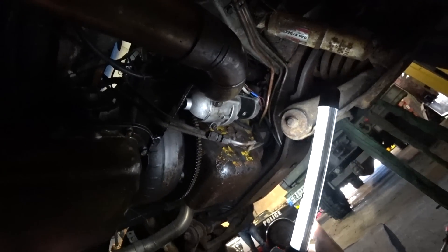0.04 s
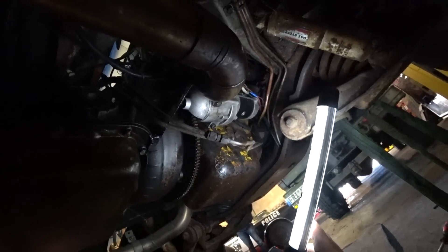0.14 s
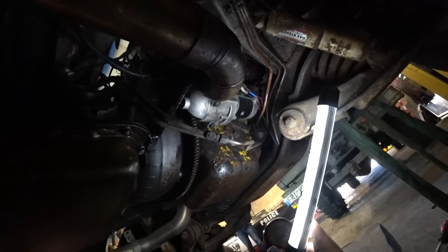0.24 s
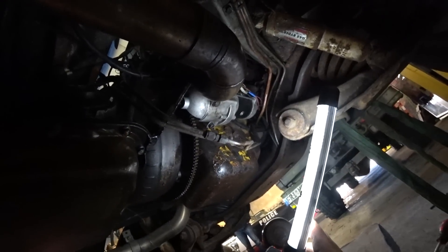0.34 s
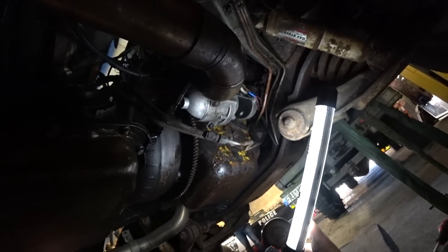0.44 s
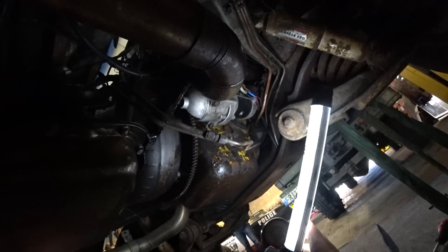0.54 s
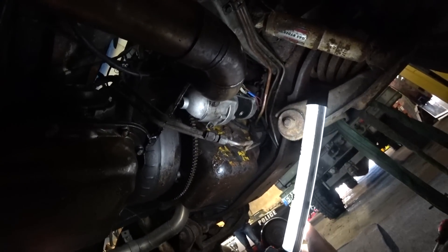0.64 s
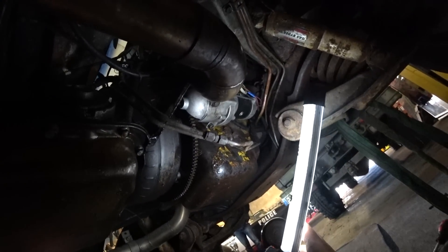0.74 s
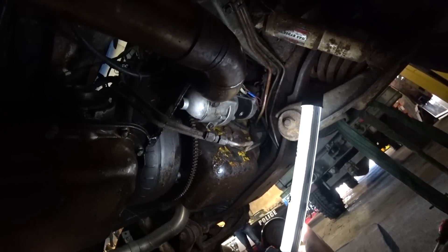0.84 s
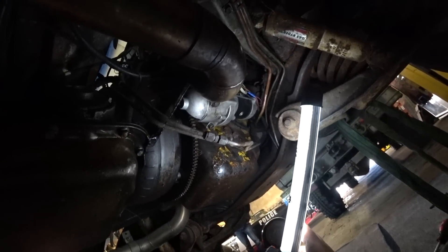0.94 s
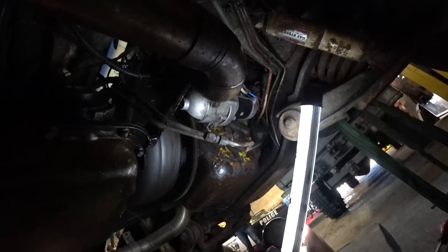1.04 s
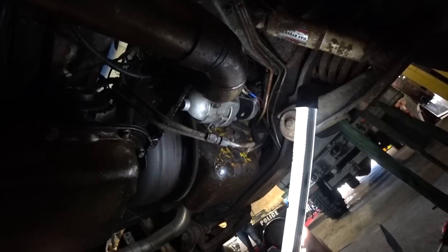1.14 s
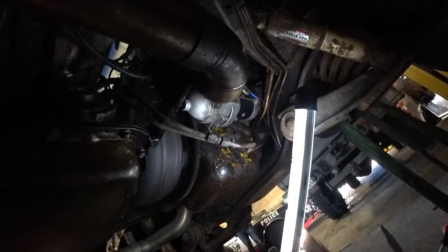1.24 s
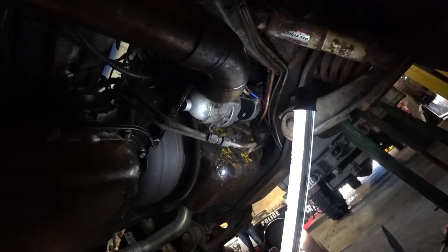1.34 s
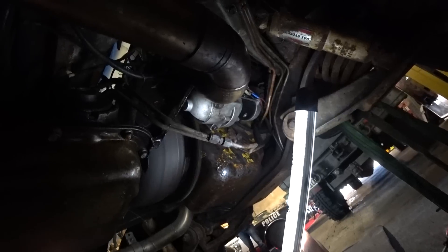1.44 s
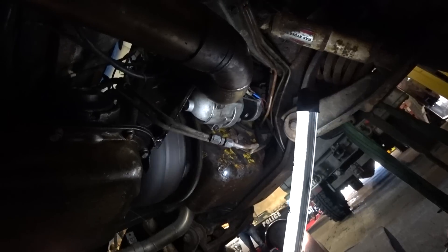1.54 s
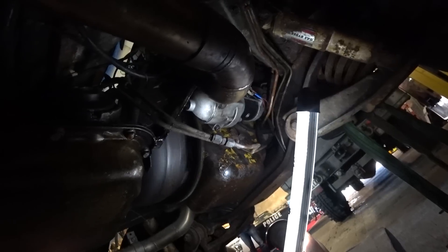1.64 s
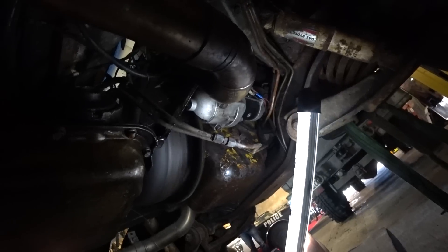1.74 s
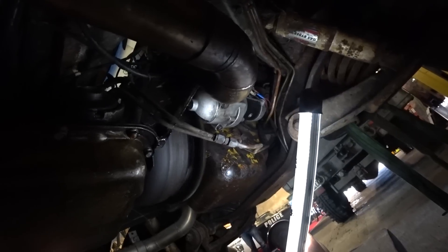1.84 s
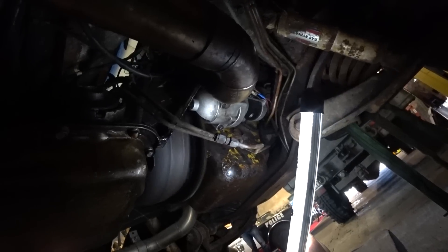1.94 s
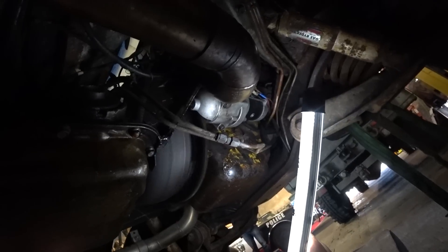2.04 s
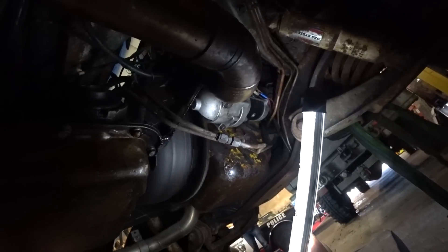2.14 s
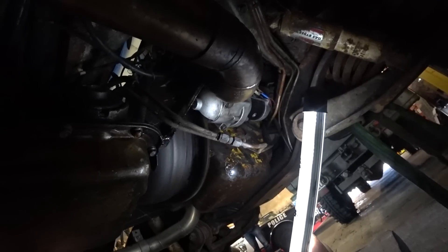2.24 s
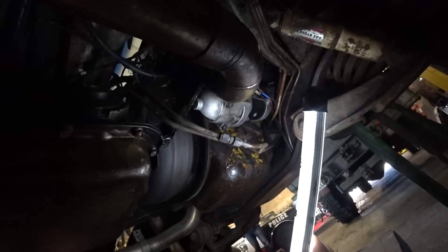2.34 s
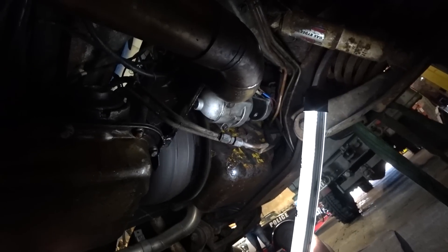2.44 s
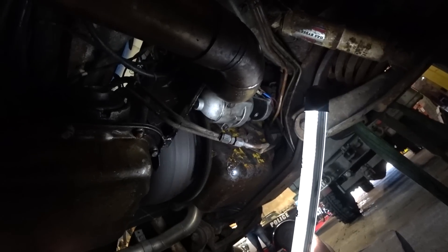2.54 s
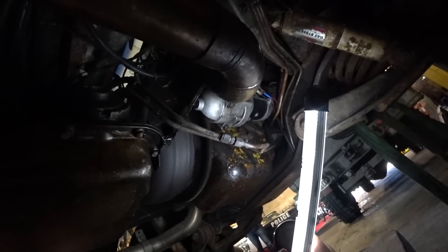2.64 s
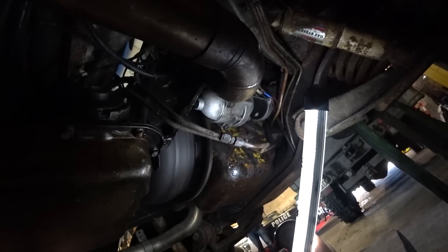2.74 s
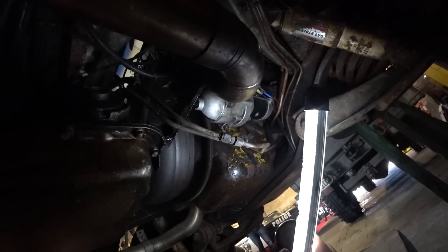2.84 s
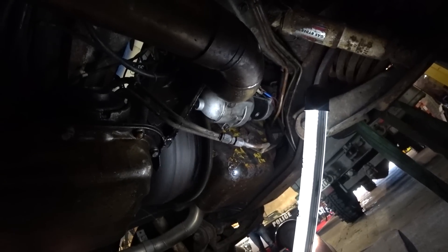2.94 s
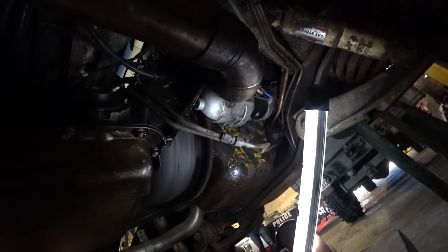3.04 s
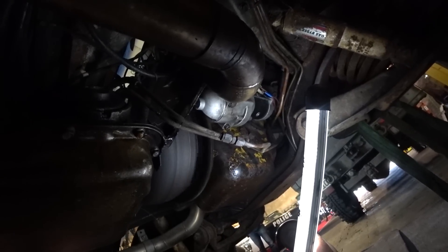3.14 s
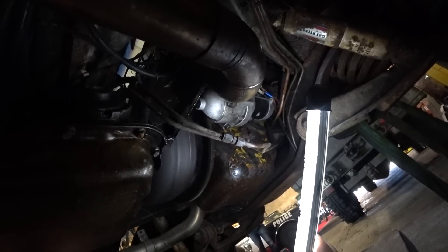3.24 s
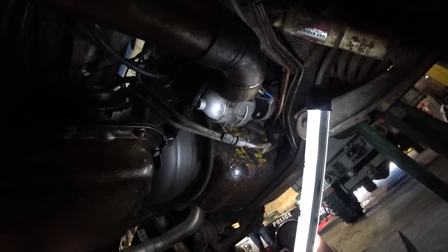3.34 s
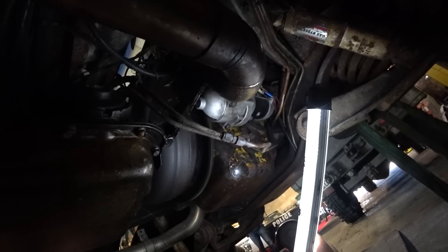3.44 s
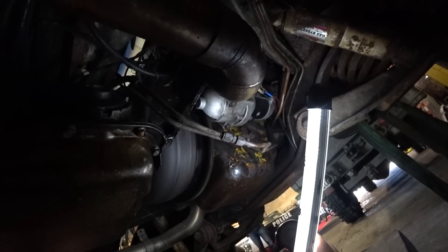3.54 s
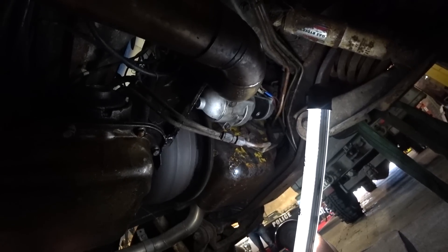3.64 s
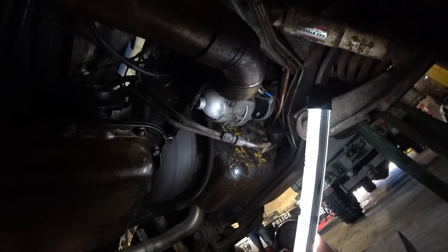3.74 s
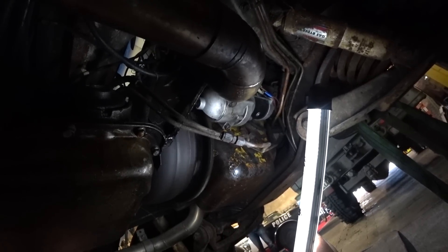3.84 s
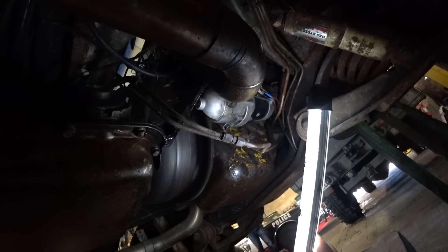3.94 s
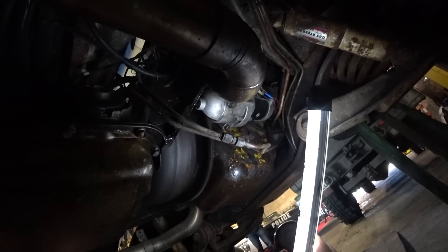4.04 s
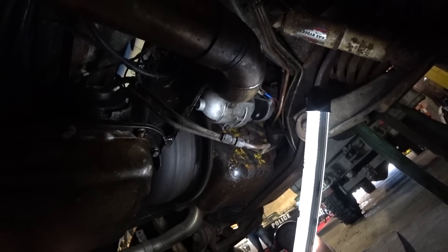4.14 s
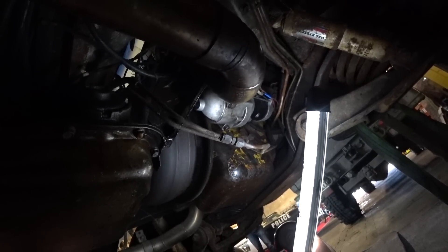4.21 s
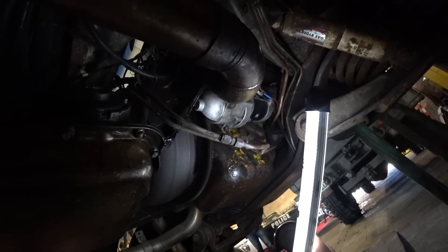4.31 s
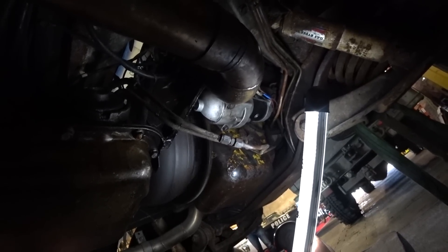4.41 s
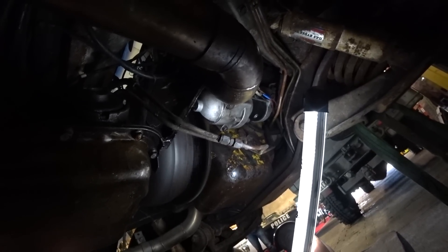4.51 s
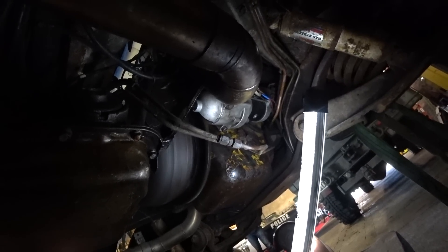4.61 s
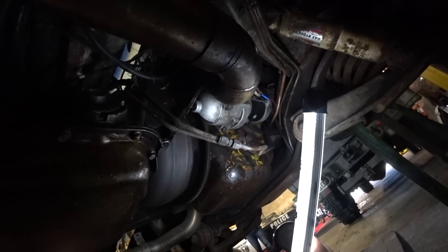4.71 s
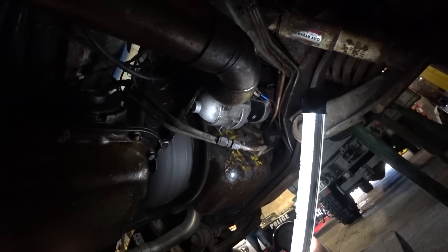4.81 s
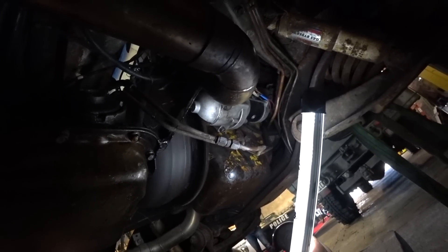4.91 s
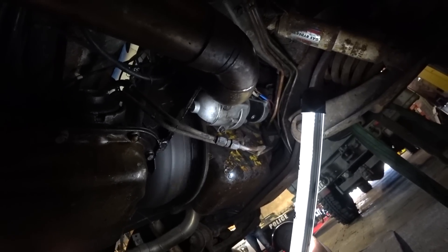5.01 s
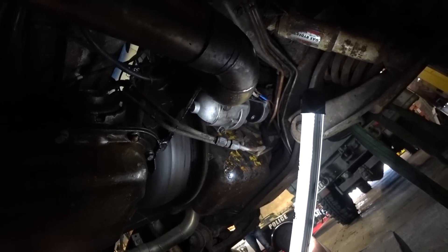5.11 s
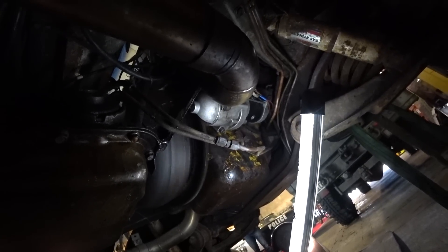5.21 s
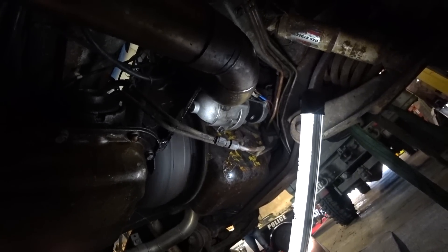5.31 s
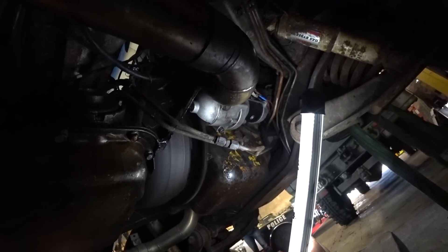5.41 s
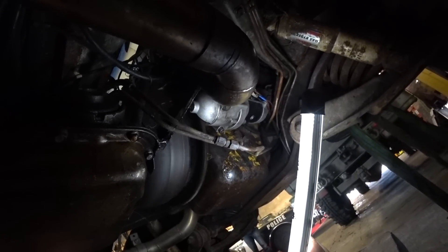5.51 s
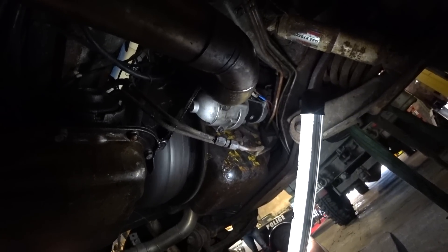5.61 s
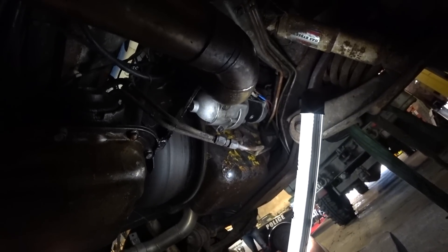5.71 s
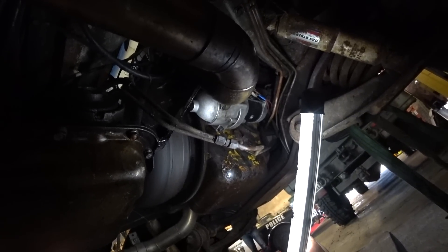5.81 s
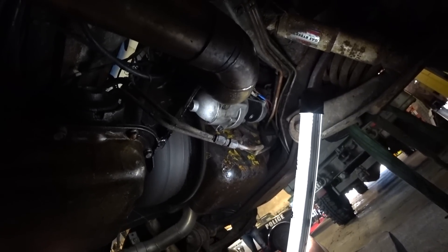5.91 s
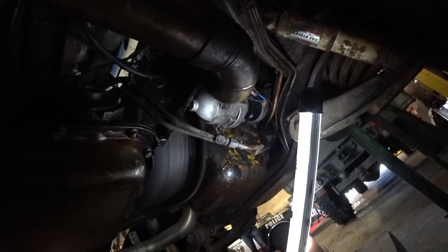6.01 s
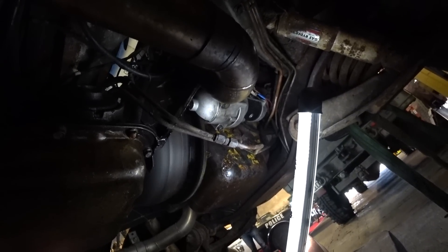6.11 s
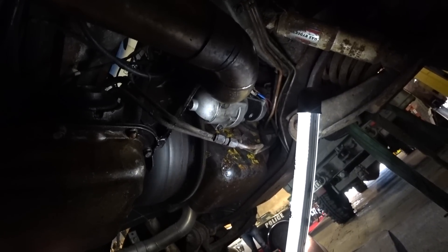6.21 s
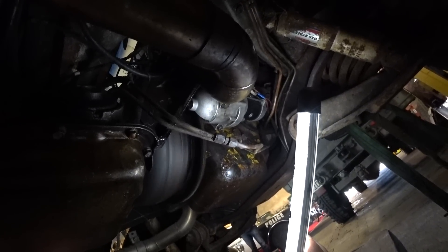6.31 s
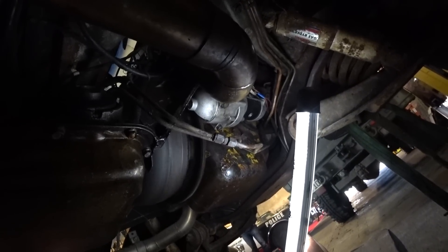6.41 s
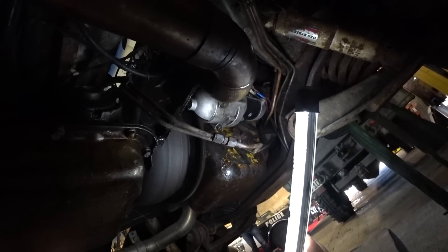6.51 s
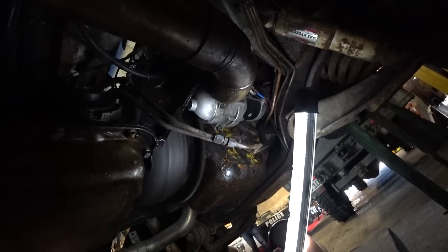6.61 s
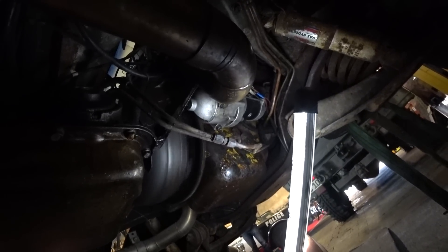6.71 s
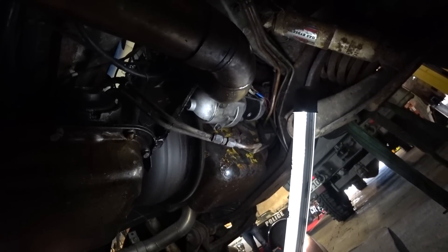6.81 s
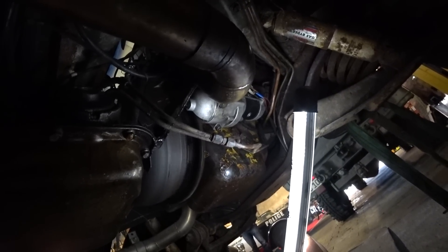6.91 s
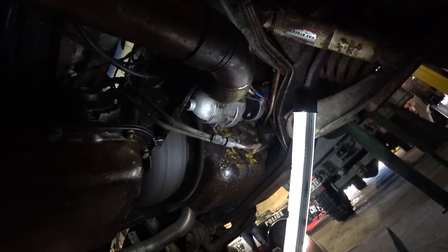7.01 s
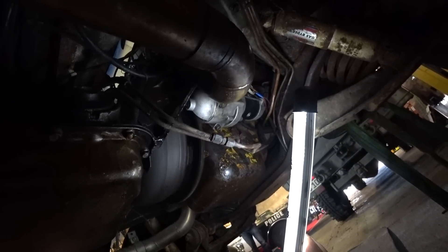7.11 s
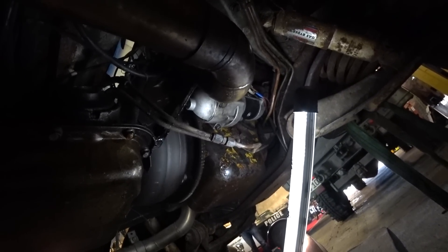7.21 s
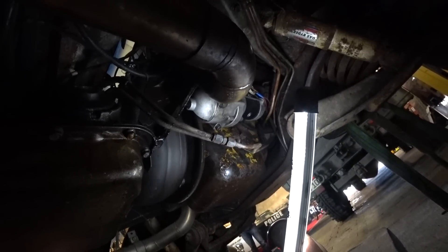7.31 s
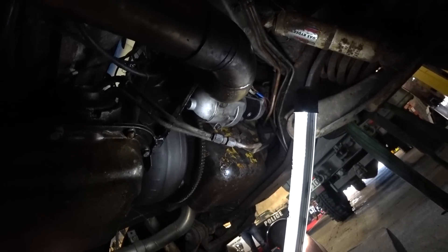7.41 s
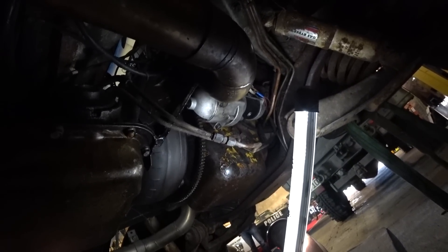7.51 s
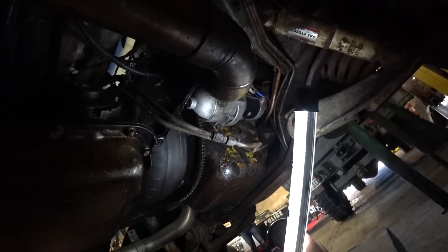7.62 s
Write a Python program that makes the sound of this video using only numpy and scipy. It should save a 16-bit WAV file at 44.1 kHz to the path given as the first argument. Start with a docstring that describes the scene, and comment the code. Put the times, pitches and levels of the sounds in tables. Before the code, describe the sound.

Close beneath a vehicle in a workshop, a diesel engine is cranked but will not start. Small ticks lead to a loud starter clack, then a steady run of grinding, whining gear teeth that sags and recovers with each compression, with a short groan about once a second. The cranking stops abruptly, leaving a brief shudder and a last metallic clack over faint room hiss.

```python
"""In a workshop, heard from under the vehicle, a starter motor cranks a diesel that never fires.
Metal ticks, the solenoid (the starter's magnetic switch) clacks, and the pinion (its small gear)
grinds round the open ring gear on the flywheel, clattering and whining. The cylinders squeeze their
air unevenly, dragging the speed up and down, and the housing groans at the hardest squeezes.
Then the drive cuts out, the teeth knock in the gaps between them and the pinion snaps back."""
import sys
import numpy as np
from scipy import signal
from scipy.fft import rfft, irfft
from scipy.io import wavfile
from scipy.ndimage import uniform_filter1d

SR = 44100
rng = np.random.default_rng(int(sys.argv[2]) if len(sys.argv) > 2 else 0)


def int16_out(signal):
    """Quantize to a 16-bit WAV file."""
    q = np.round(np.clip(np.atleast_2d(signal).T, -1, 1) * 32767)
    wavfile.write(sys.argv[1], SR, q.astype(np.int16))


N = 337806
TIME = np.arange(N) / SR
RING_TEETH, PINION_TEETH = 139, 11
MOTOR_ORDER = 3.1  # vibrations of the starter's own gearing per ring-gear tooth
FLICKER_HZ = 14


def amp(db):
    """Turns decibels into a gain."""
    return 10 ** (np.asarray(db) / 20)


def unit(x):
    """Scales a signal to an average (rms) level of 1."""
    return x / np.sqrt(np.mean(x ** 2) + 1e-20)


def bump(at, width_s, t=TIME):
    """A smooth rise and fall that reaches 1 at the given second."""
    return np.exp(-((t - at) / width_s) ** 2)


def read(points, hz):
    """Reads between a table's rows on a log-frequency axis."""
    row_hz, value = np.transpose(points)
    return np.interp(np.log(hz + 1), np.log(row_hz + 1), value)


def wander(hz, size=4096):
    """A random drift of average size 1, moving up to about the given rate."""
    rates = np.fft.rfftfreq(size, TIME[-1] / size)
    spectrum = rfft(rng.standard_normal(size)) / (1 + (rates / hz) ** 4)
    return np.interp(TIME, np.linspace(0, TIME[-1], size), unit(irfft(spectrum)))


def colour(x, spectrum, resonances=(), size=8192):
    """Filters a sound with a broad tone curve and narrow ringing peaks."""
    hz = abs(np.fft.fftfreq(size, 1 / SR))
    gain = amp(read(spectrum, hz))
    for centre, width, lift_db in resonances:
        gain = gain * np.sqrt(1 + (amp(abs(lift_db)) ** 2 - 1) / (1 + (2 * (hz - centre) / width) ** 2))
    # this phase makes the ringing follow a hit, never come before it
    response = np.fft.ifft(np.exp(np.conj(signal.hilbert(np.log(gain))))).real
    return signal.oaconvolve(x, response[:size // 2])[:len(x)]


def steady(x, size):
    """Evens out the level over `size` samples."""
    return x / np.sqrt(abs(uniform_filter1d(x ** 2, size)) + 1e-9)


def swell(x, low_hz, high_hz, lift_db):
    """Lifts and lowers one band about its usual level."""
    band = signal.sosfiltfilt(signal.butter(2, [low_hz, high_hz], "band", fs=SR, output="sos"), x)
    return x + band * (amp(lift_db) - 1)


def rough_tone(turns, rough):
    """One tone, shaken in strength and phase as by loosely fitting teeth."""
    angle = 2 * np.pi * (turns + rng.random())
    return (1 + rough * wander(64)) * np.cos(angle) + rough * wander(59) * np.sin(angle)


# The shop's background noise. Each row: frequency in Hz, relative level in dB.
AIR_COLOUR = [(25, -6), (65, -3), (100, 0), (150, -9), (250, -12), (400, -14), (1200, -14), (2000, -19),
              (3000, -23), (5000, -27), (7000, -26), (9500, -32)]


def workshop_air(level_db=-61, width=.22):
    """The quiet rumble and hiss of the shop, slightly different in each ear."""
    middle, side = (unit(colour(rng.standard_normal(N), AIR_COLOUR)) for _ in range(2))
    return amp(level_db) * unit(np.array([middle + width * side, middle - width * side]))


# Small metal ticks close by. Each row: start in seconds, relative level in dB.
TICK_HITS = [(0.3875, -34), (0.631, -44), (0.8594, -40)]
# The notes they ring with. Each row: pitch in Hz, width in Hz, boost in dB.
TICK_RINGS = [(4950, 90, 25), (7790, 80, 13), (9700, 90, 10)]


def ticks(decay_s=0.0097, level_db=-12):
    """Tiny taps on a thin metal part that pings."""
    taps = sum(amp(db) * (TIME >= s) * np.exp(-abs(TIME - s) / decay_s) for s, db in TICK_HITS)
    spectrum = [(300, -26), (2500, -25), (4500, -12), (6500, -8), (11000, 0)]
    return amp(level_db) * colour(taps * rng.standard_normal(N), spectrum, TICK_RINGS)


# Knocks of solenoid, pinion and loose teeth. Each row: start in seconds, relative level in dB,
# bass score, treble score (a higher score gives more of that band).
KNOCK_HITS = [(0.792, -16, -40, -17), (1.02, -7, -26, 1.5), (7.316, -26.5, -8, -23.5),
              (7.35, -24, -14, -26), (7.38, -24, -51, -17), (7.497, -17.5, -40, -28)]
# The tone of a knock's crash. Each row: frequency in Hz, gain in dB.
CRASH_COLOUR = [(60, -20), (250, -12.5), (600, -5), (1200, -3), (2000, -1), (3000, 2.5), (5000, -2),
                (6500, -10.5), (11000, -18)]
# The starter body's notes. Each row: pitch in Hz, relative level in dB, seconds to fade by 60 dB.
STARTER_RINGS = [(358, -31, 0.5), (783, -25, 0.23), (1060, -14.5, 0.13), (1170, -11.5, 0.076),
                 (1560, -16, 0.14), (2220, -16.5, 0.13), (2910, -8, 0.087), (3480, -2.5, 0.048),
                 (4060, -14, 0.05), (5200, -4.5, 0.04), (5800, -12, 0.046)]


def knocks(rise_s=0.0014, crack_s=0.01, rattle_db=-23, rattle_s=0.016, ring_db=-6, level_db=-8):
    """Steel slams on steel: a short crash of contacts and the ring of the starter body."""
    out, t = np.zeros(N + SR), np.arange(SR // 2) / SR
    _, _, usual_bass, usual_treble = np.median(KNOCK_HITS, axis=0)
    fade = np.exp(-t / crack_s) + amp(rattle_db) * np.exp(-t / rattle_s)
    ring = sum(amp(db - 60 * t / fade_s) * np.sin(2 * np.pi * hz * t) for hz, db, fade_s in STARTER_RINGS)
    for start, db, bass, treble in KNOCK_HITS:
        crash = colour(rng.standard_normal(len(t)) * fade, CRASH_COLOUR)
        tilt = [(900, 0.42 * (bass - usual_bass)), (2800, 0.016), (6500, 0.53 * (treble - usual_treble))]
        hit = colour(crash + amp(ring_db) * ring, tilt)
        hit *= 1 - np.exp(-t / rise_s)  # the contacts close one after another
        out[round(start * SR):][:len(t)] += amp(db + level_db) * hit / np.std(hit[:SR // 100])
    return out[:N]


def motor_rub(at=0.863, width_s=0.079, level_db=-56):
    """The motor creeps round with a faint rub before the pinion bites."""
    spectrum = [(100, -12.5), (400, -2.5), (700, -3), (1100, 0), (1700, -13), (2900, -4), (4000, -15),
                (6000, -15), (9000, -26)]
    return amp(level_db) * unit(colour(rng.standard_normal(N), spectrum)) * bump(at, width_s)


# Engine cycles, each ending as the tightest cylinder squeezes hardest.
# Each row: end in seconds, strength of that cycle's squeezes (1 is normal).
ENGINE_CYCLES = [(1.646, 1.15), (2.789, 1.05), (3.94, 1.07), (5.06, .97), (6.171, .95), (7.291, .97)]
# Only four cylinders hold their air. Each row: place in the cycle from 0 to 1, how hard it brakes.
SQUEEZES = [(.265, .30), (.724, .347), (.859, .27), (1, .455)]


def cranking_speed(free_teeth_per_s=318, start_s=1.03, spin_up_s=.033, first_cycle_s=1.282, cut_s=7.27,
                   coast_s=0.18, squeeze_s=.075, spring_s=.038, recover_s=.193, slow_share=.657):
    """Teeth passing per second: each squeeze brakes the engine, which springs back and regains speed."""
    t = np.linspace(0, TIME[-1], 4096)
    ends, strengths = np.transpose(ENGINE_CYCLES)
    starts = np.r_[ends[0] - first_cycle_s, ends[:-1]]
    drag = np.zeros(len(t))
    for start, end, strength in zip(starts, ends, strengths):
        for place, tightness in SQUEEZES:
            top = start + place * (end - start)
            if top > start_s:
                spring = (1 - slow_share) * bump(top, spring_s, t)
                recover = slow_share * np.exp(-abs(t - top) / recover_s)
                drag += strength * tightness * np.where(t < top, bump(top, squeeze_s, t), spring + recover)
    spin_up = 1 - np.exp(-np.maximum(t - start_s, spin_up_s / 10) / spin_up_s)
    coast = np.maximum(t - cut_s, 0) / coast_s
    return np.interp(TIME, t, free_teeth_per_s * spin_up * np.exp(-drag - coast))


def effort(speed, usual_teeth_per_s=245, octaves_per_s=5):
    """Load (octaves below the usual speed) and pull (-1 braking to 1 speeding up)."""
    load = np.clip(np.log2(usual_teeth_per_s / speed), -1, .5)
    pull = np.tanh(np.gradient(np.log2(speed)) * SR / octaves_per_s)
    return load, pull


def engaged(start_s=1.04, rise_s=0.007, stop_s=7.23, fade_s=0.015):
    """The gears take up the load quickly and fall quiet once the current is cut."""
    return np.clip((TIME - start_s) / rise_s, 0, 1) * np.exp(-np.maximum(TIME - stop_s, 0) / fade_s)


def tooth_strikes(teeth, jitter_s, worn_db, chance_db):
    """One sharp click per tooth; the wear on each gear repeats with every turn."""
    number = np.arange(1, int(teeth[-1]) - 1)
    late, chance = rng.standard_normal((len(number), 2)).T
    wear = sum(rng.standard_normal(count)[number % count] for count in (PINION_TEETH, RING_TEETH))
    force = amp(worn_db * wear + chance_db * chance)
    at = (np.interp(number, teeth, TIME) + jitter_s * late) * SR
    near = at.astype(int)[:, None] + np.arange(-8, 9)
    clicks = force[:, None] * np.sinc(near - at[:, None])  # lets a click fall between samples
    return unit(np.bincount(near.ravel(), clicks.ravel(), N)[:N])


# Travel time of bending waves in the steel. Each row: frequency in Hz, delay in seconds.
STEEL_DELAYS = [(500, 0.002912), (2000, 0.008), (3500, 0.0067), (6000, 0.006), (11000, 0.0065)]


def through_steel(x):
    """Pitches cross steel at different speeds, smearing each click into a short chirp."""
    hz = np.fft.rfftfreq(N, 1 / SR)
    lag_turns = np.cumsum(read(STEEL_DELAYS, hz)) * hz[1]
    return irfft(rfft(x) * np.exp(-2j * np.pi * lag_turns), N)


def flywheel(x, ring_s=0.0062, shift_hz=20, count=6):
    """The contact travels round the wheel, so its mix of notes keeps shifting at an even level."""
    t = np.arange(SR // 20) / SR
    rings = rng.standard_normal((count, len(t))) * np.exp(-t / ring_s)
    mix = np.array([wander(shift_hz) for _ in rings])
    ringing = signal.oaconvolve(x[None], rings, axes=1)[:, :N]
    return unit((mix * ringing).sum(0) / np.linalg.norm(mix, axis=0))


# The tone of the clattering teeth. Each row: frequency in Hz, relative level in dB.
TOOTH_COLOUR = [(50, -37.5), (150, -27.5), (260, -23.5), (400, -20), (1000, -13), (1400, -10.5), (2000, -3),
                (3200, 0.5), (4200, 1), (5400, 2), (6200, -5), (7000, -4.5), (7600, -12.5), (11000, -12.5)]
# The notes of the housing round the flywheel. Each row: pitch in Hz, width in Hz, boost in dB.
HOUSING_RINGS = [(525.7, 18.6, 9.5), (711, 42, 7), (772, 29, 6), (1065, 210, 2.5), (1800, 103, 6.5),
                 (2250, 160, 2.5), (2534, 59, 9.5), (3208, 94, 8), (3560, 170, 2), (4190, 78, 4),
                 (4574, 80, 3.5), (8290, 210, 5.5)]


def clatter(teeth, load, pull, rebound_db=-6, scrape_db=-5, wheel_db=1, level_db=-15, stall_db=-7):
    """Each tooth strikes, scrapes and bounces, and the flywheel and housing ring."""
    strike = tooth_strikes(teeth + 0.0094 * wander(44), jitter_s=.000034, worn_db=0.96, chance_db=1.23)
    bounce = tooth_strikes(teeth - .37 + 0.0817 * wander(23.8), jitter_s=.0001, worn_db=0, chance_db=1.5)
    scrape = unit(rng.standard_normal(N) * np.exp(-(teeth % 1) / 0.48))  # fades along each tooth
    force = unit(through_steel(strike + amp(rebound_db) * bounce + amp(scrape_db) * scrape))
    metal = colour(force + amp(wheel_db) * flywheel(force), TOOTH_COLOUR, HOUSING_RINGS)
    # load dulls the teeth, hard braking makes them rattle
    treble_db = -4 * load + 2 * np.minimum(pull, 0) ** 4 + 1.6 * wander(FLICKER_HZ)
    metal = swell(metal, 7100, 18000, treble_db)
    metal = swell(metal, 1800, 2770, lift_db=pull + 0.4 * wander(FLICKER_HZ))
    slowing_db = stall_db * np.maximum(load, 0) ** 2 - load  # slower teeth are quieter
    return steady(metal, size=1100) * amp(level_db + slowing_db + 0.38 * wander(FLICKER_HZ))


# The tones of the meshing gears. Each row: multiple of the tooth rate, relative level in dB.
GEAR_TONES = [(2, -2), (3, -3), (4, -0.5), (5, 2), (6, -12), (7, 1.5), (8, -21)]
# The tone curve the whine passes through. Each row: frequency in Hz, gain in dB.
GEAR_COLOUR = [(150, -45), (300, -12), (450, -14), (540, -9), (610, -18), (700, -6), (790, -3), (910, -2),
               (1000, -7), (1150, -2.5), (1380, -12.5), (1580, -2), (1800, 1.5), (2600, -5), (4000, -12.5)]


def whine(teeth, load, pull, rough=0.43, level_db=-44, load_db=5, pull_db=2, flicker_db=3):
    """Ring-gear and starter-gear tones grow under load and flare as they cross the housing's notes."""
    ring_gear = sum(amp(db) * rough_tone(k * teeth, rough) for k, db in GEAR_TONES)
    motor = sum(amp(db) * rough_tone(k * MOTOR_ORDER * teeth, rough)
                for k, db in [(1, 2), (2, -6), (3, -14)])
    gain = amp(level_db + load_db * load + pull_db * pull + flicker_db * wander(FLICKER_HZ))
    return colour((ring_gear + motor) * gain, GEAR_COLOUR, HOUSING_RINGS)


# How the hum follows the speed. Each row: teeth per second, relative level in dB.
HUM_LEVELS = [(170, -60), (240, -45), (300, -50)]


def hum(teeth, speed, flicker_db=2):
    """A low note at the tooth rate, which the panels give off poorly when the engine slows."""
    level_db = read(HUM_LEVELS, speed) - flicker_db / 2 + flicker_db * wander(FLICKER_HZ)
    return amp(level_db) * rough_tone(teeth, rough=0.58)


# Groans as the starter takes up the load and at the hardest squeezes.
# Each row: loudest moment in seconds, level in dB, half-length in seconds.
GROAN_SURGES = [(1.051, -23.5, 0.018), (1.662, -42, .03), (2.81, -36.5, 0.026), (3.963, -30.5, 0.019),
                (5.084, -33.5, .02), (6.2, -33.5, 0.018)]
# The tone of their rasp. Each row: frequency in Hz, relative level in dB.
RASP_COLOUR = [(60, -23), (300, -16), (520, -9), (750, -12), (900, 0), (1200, -11), (1600, -22),
               (4000, -45)]


def groans(note_hz=532, note_db=4.5, lead_s=0.021, stretch=1.5):
    """The strained housing rasps; in all but the first groan its lowest note sings just ahead."""
    surge = sum(amp(db) * bump(s, width_s) for s, db, width_s in GROAN_SURGES)
    sing = sum(amp(db + note_db) * bump(s - lead_s, stretch * width_s)
               for s, db, width_s in GROAN_SURGES[1:])
    rasp = steady(colour(rng.standard_normal(N), RASP_COLOUR, HOUSING_RINGS), size=1500)
    return surge * rasp + sing * rough_tone(note_hz * TIME, rough=.2)


def rundown(teeth, at=7.32, motor_at=7.27, body_hz=783):
    """The engine shudders to rest while the motor spins down and the starter body sings on."""
    spectrum = [(40, -11), (90, 4), (140, -3), (260, 3.5), (450, -4), (800, -6), (1400, -9),
                (3500, -13), (9000, -34)]
    shudder = amp(-46) * unit(colour(rng.standard_normal(N), spectrum)) * bump(at, width_s=0.17)
    spin = amp(-51) * rough_tone(MOTOR_ORDER * teeth, rough=0.56) * bump(motor_at, width_s=0.048)
    sing = amp(-51) * rough_tone(body_hz * TIME, rough=0.73) * bump(at, width_s=0.15)
    return shudder + spin + sing


def reverberate(x, decays, size=128):
    """A dense wash of echoes in stereo, each band dying at its own speed."""
    hz, t, noise = signal.stft(rng.standard_normal((2, SR // 2)), SR, nperseg=size)
    fade = np.exp(-np.log(1000) * t / read(decays, hz)[:, None])
    tail = signal.istft(noise * fade, SR, nperseg=size)[1]
    tail[:, :size // 4] = 0  # a gap before the first echo
    tail /= np.linalg.norm(tail, axis=1, keepdims=True)
    return signal.oaconvolve(x[None], tail, axes=1)[:, :N]


# Echoes under the vehicle and in the shop. Each row: frequency in Hz, seconds to fade by 60 dB.
UNDERBODY_FADES = [(200, 0.044), (1000, 0.037), (4000, 0.05), (11000, 0.012)]
SHOP_FADES = [(200, .6), (1000, 0.76), (3000, 0.36), (6000, 0.18), (11000, 0.11)]
# Strength of the sideways echoes under the vehicle. Each row: frequency in Hz, gain in dB.
SIDE_COLOUR = [(100, -32), (400, -21), (1400, -13), (2800, -25), (5500, -23), (9500, -6.5)]


def echoes(x, shop_db=-24):
    """Sound bounces quickly off the underbody and lingers faintly in the shop."""
    underbody = reverberate(colour(x, SIDE_COLOUR), UNDERBODY_FADES)
    return underbody + amp(shop_db) * reverberate(x, SHOP_FADES)


# The balance between the ears. Each row: frequency in Hz, left minus right in dB.
BALANCE = [(100, -3), (600, 0), (1400, -1.5), (2800, -0.3), (5500, -1), (9500, -3)]


def scene(flutter=.008):
    """Gears and knocks close by, with their echoes, over the quiet air of the shop."""
    speed = cranking_speed()
    load, pull = effort(speed)
    teeth = np.cumsum(speed * (1 + flutter * wander(39.89))) / SR  # ring-gear teeth passed so far
    gears = (clatter(teeth, load, pull) + whine(teeth, load, pull) + hum(teeth, speed)) * engaged()
    source = gears + groans() + knocks() + ticks() + motor_rub() + rundown(teeth)
    ears = [colour(x, [(hz, sign * db / 2) for hz, db in BALANCE])
            for x, sign in zip(source + echoes(source), (1, -1))]
    return np.array(ears) + workshop_air()


def record(dry, ceiling=.56, top_hz=11030):
    """Rounds off the loudest peaks, then removes the highest treble."""
    rounded = dry / (1 + (dry / ceiling) ** 6) ** (1 / 6)
    lowpass = signal.firwin(511, top_hz, window=("kaiser", 9), fs=SR)
    return signal.oaconvolve(rounded, lowpass[None], "same")


dry = scene()
out = record(dry)
int16_out(out)
```